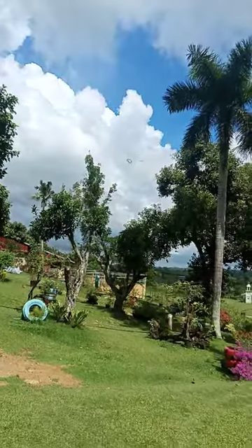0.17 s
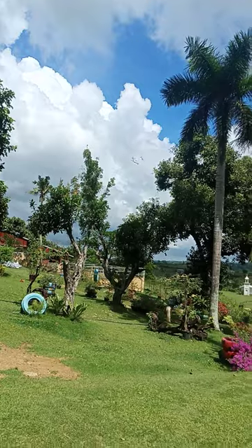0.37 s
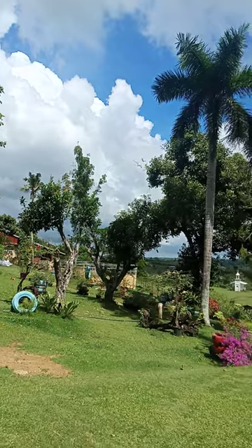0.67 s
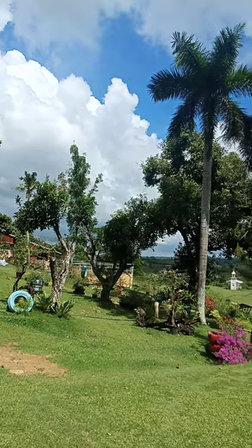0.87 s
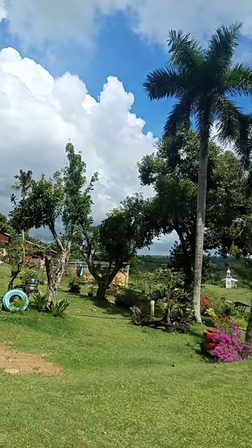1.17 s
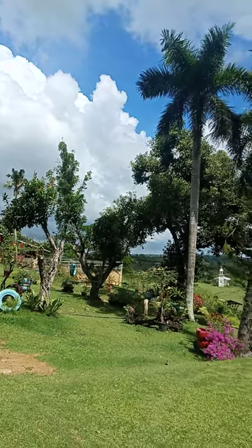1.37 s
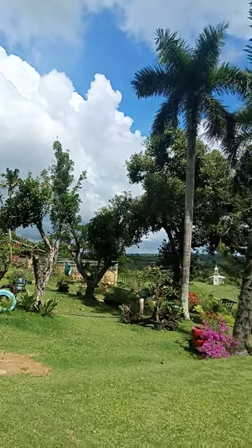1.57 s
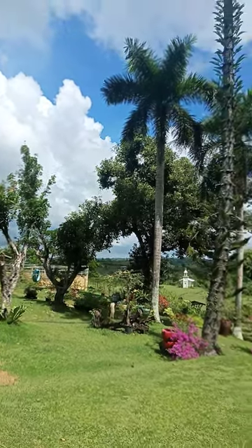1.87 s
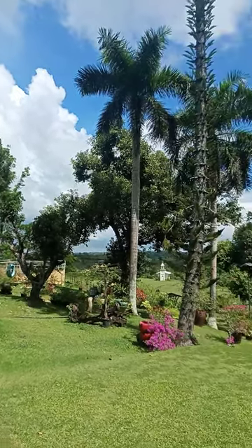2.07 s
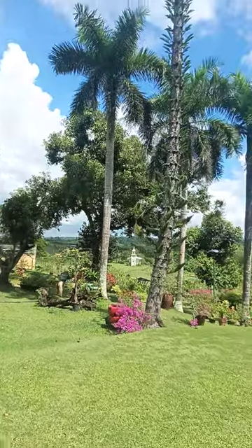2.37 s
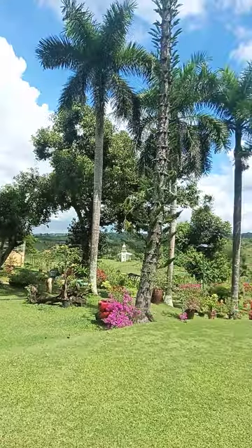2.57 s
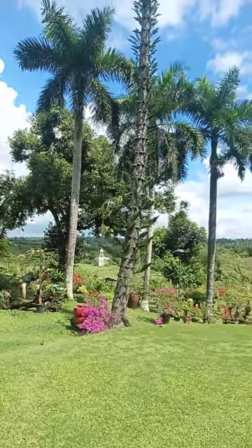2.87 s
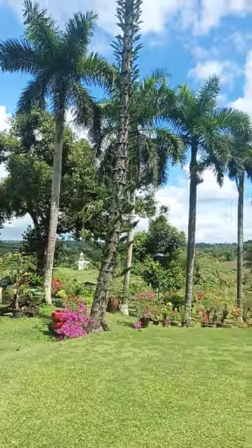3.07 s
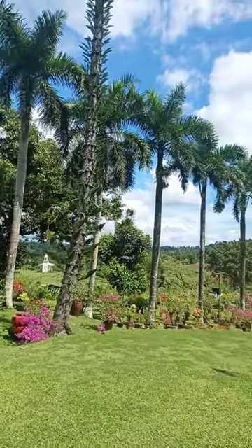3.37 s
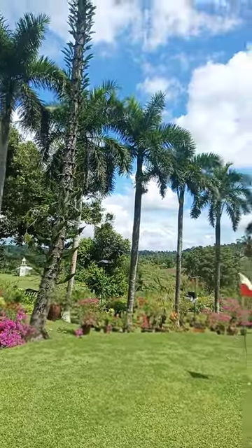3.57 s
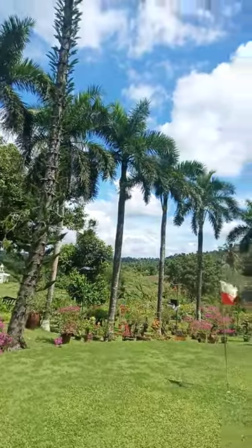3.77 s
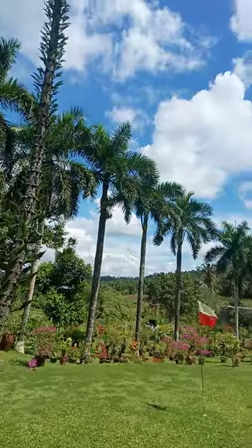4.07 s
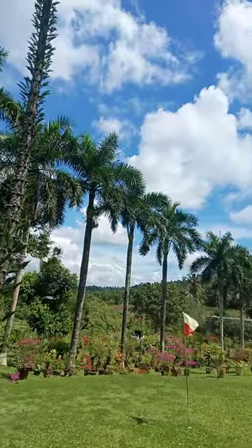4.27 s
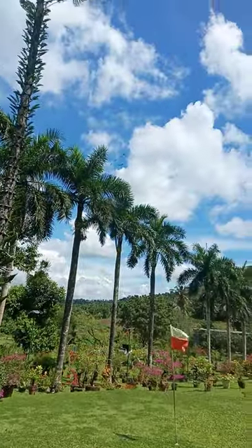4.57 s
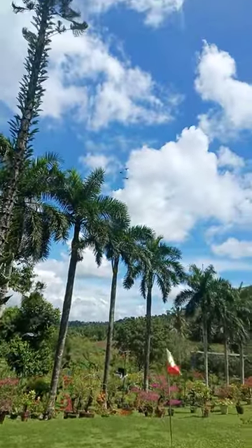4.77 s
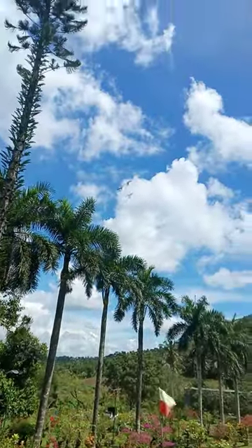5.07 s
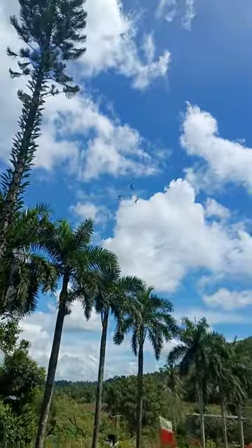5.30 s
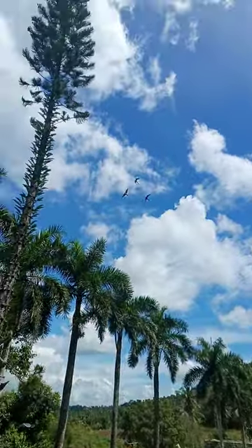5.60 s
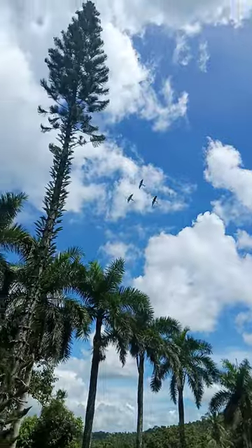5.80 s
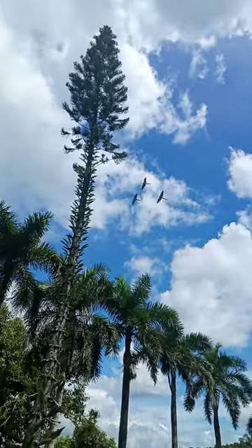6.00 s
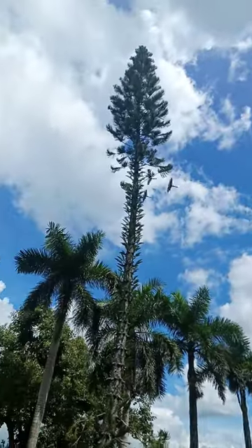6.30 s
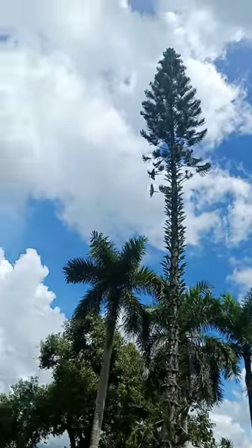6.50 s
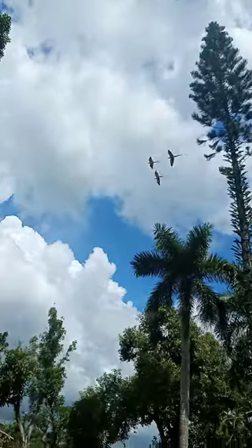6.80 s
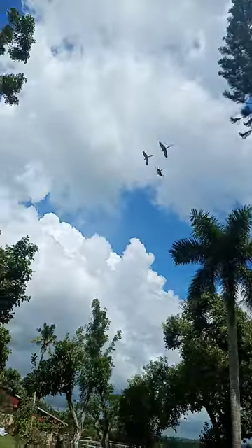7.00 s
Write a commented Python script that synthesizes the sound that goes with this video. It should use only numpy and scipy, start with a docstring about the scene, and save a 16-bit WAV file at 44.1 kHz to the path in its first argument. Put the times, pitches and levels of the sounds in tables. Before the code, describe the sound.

Loud raucous macaw calls ring out one after another outdoors, echoing softly off trees above quiet rustling, a low hum and wind puffs.

```python
"""Macaws over a garden

Macaws fly over, trading clear falling screams, harsh squawks and low rattling growls.
Screams and squawks are stacks of harmonics that roughen or break into pulses, shaped by throat and beak.
Growls are short throat rings restarted by each pulse. Trees scatter the calls into an echo.
Far birds whistle and rasp, over rumble, rustling, hum and gusts of wind made from filtered noise and a sine."""
import sys
import numpy as np
from scipy import signal
from scipy.fft import rfft, irfft, next_fast_len
from scipy.io import wavfile
from scipy.ndimage import uniform_filter1d, minimum_filter1d

SR = 44100
rng = np.random.default_rng(int(sys.argv[2]) if len(sys.argv) > 2 else 0)


def persist_wave(psi):
    """Save psi, clipped to +-1, as 16-bit WAV."""
    counts = np.round(np.clip(psi, -1, 1) * 32767).astype(np.int16)
    wavfile.write(sys.argv[1], SR, np.atleast_2d(counts).T)


N = 315178
TIME = np.arange(N) / SR  # s

# Background levels over time: t/s, distant rumble/dB, wind before gusts/dB, rustle before swells/dB
BREEZE_LEVELS = [(0, -40.5, -44.5, -45.5), (2.2, -39.5, -53, -42.5), (2.698, -47, -48, -41),
                 (3.2, -43.5, -42.5, -46.5), (4.9, -35.5, -34, -40), (7.15, -35.5, -39, -37.5)]
# Gusts on the microphone: peak t/s, length/s, level/dB
WIND_GUSTS = [(3.56, 0.18, -38), (4.415, .06, -27.5), (4.54, 0.072, -25), (5.49, 0.056, -25.5),
              (5.777, 0.12, -26), (6.173, 0.045, -17), (6.258, 0.07, -24.5), (6.863, 0.07, -22.5)]
# Swells of rustling: peak t/s, level/dB
RUSTLE_SWELLS = [(2.33, -37.5), (3.56, -36.5), (4.5, -33), (5.68, -36.5), (6.32, -31.5)]
# Level of the low hum over time: t/s, level/dB
HUM_LEVELS = [(0, -57.5), (3.3, -53.5), (4.3, -41.5), (5.6, -40), (6.1, -32.5), (7.15, -30)]
# Colour of the distant rumble: f/Hz, level/dB
RUMBLE_COLOUR = [(25, -20.5), (38, -17), (52, -11), (72, -1), (100, 6), (145, 2), (200, -5.5), (280, -13.5),
                 (400, -30), (800, -74.5)]
# Colour of the wind: f/Hz, level/dB
WIND_COLOUR = [(25, -23.5), (45, -7.5), (72, 3), (140, 1.5), (200, -6), (300, -19), (800, -70)]
# Colour of the rustling: f/Hz, level/dB
RUSTLE_COLOUR = [(150, -0.5), (280, -1), (550, -1), (900, -9), (1500, -13), (3000, -14.5), (5000, -46),
                 (9000, -68.5)]
# Colour of the countryside hiss: f/Hz, level/dB
COUNTRY_COLOUR = [(300, -18.5), (900, 4), (1600, 1), (2700, 0.5), (3200, -6), (4000, -8), (5000, -28),
                  (7000, -43.5), (10000, -59.5), (15000, -56.5)]
# Colour of the echo from the trees: f/Hz, level/dB
TREE_COLOUR = [(300, 1.5), (4000, 9.0), (7000, 12.5), (14000, -11.0)]

# Faint arched whistles: start t/s, end t/s, top pitch f/Hz, droop at the ends/0-1, level/dB
FAR_WHISTLES = [(0.01, 0.287, 1675, .025, -42.5), (0.168, 0.382, 1425, 0.16, -34),
                (0.281, .46, 1410, 0.06, -40), (0.329, .46, 1695, 0.05, -39),
                (1.08, 1.376, 1233, 0.14, -44.5), (1.75, 1.948, 1603, 0.12, -29.5),
                (6.48, 6.776, 1211, 0.05, -44.5)]
# Faint hoarse calls: start t/s, end t/s, level/dB, upper resonance/dB
HOARSE_CALLS = [(2.202, 2.856, -35, -12), (3.484, 3.704, -36.5, -7.5), (5.615, 5.914, -39.5, -3),
                (6.35, 6.427, -32, 5)]
# Growls: start t/s, end t/s, first pulse rate f/Hz, resonance before scoop and sag f/Hz,
# level/dB, swell/(dB per s)
GROWL_CALLS = [(.52, 1.08, 127.1, 1983, -27, 8), (2.419, 2.832, 119.4, 1834, -36.5, 20.5),
               (4.599, 5.096, 120.5, 2154, -28, 5)]
# Harsh squawks: start t/s, end t/s, attack/s, mid pitch f/Hz, rise/(Hz per s),
# mid level/dB, swell/(dB per s), upper resonance/dB
SQUAWK_CALLS = [(0.981, 1.385, .09, 1159, 100.5, -17.5, -4.5, -11.5),
                (3.665, 4.006, .004, 1207, 280, -16.5, 2, -14.5),
                (4.299, 4.639, .002, 1216, 22, -16, 2.5, -16),
                (5.627, 5.86, 0.0013, 1193, 6.5, -40, -3, -10.5),
                (5.88, 6.203, .002, 1144, 25.5, -18, 32.5, -15),
                (6.388, 6.705, 0.0083, 1188, -79.5, -16.5, -12, -13),
                (6.961, 7.251, .002, 1232, -450, -13.5, 33.5, -10)]
# Moments when a squawk holds a tone, then rattles slowly: t/s, length/s, pitch f/Hz, roughness/0-1,
# level change/dB, upper resonance change/dB, rattle rate f/Hz, rattle roughness/0-1
TONE_LOCKS = [(3.765, 0.047, 1249, 0.32, 1, -6, 73.3, 0.84),
              (4.392, 0.049, 1259, 0.28, 3.5, -4.5, 71.64, 0.83),
              (5.971, .046, 1094, .1, 1.5, -7.5, 60.6, 0.6), (6.505, .05, 1126, .6, -0.5, 0, 70.66, .84),
              (7.051, .052, 1157, .2, 5, -18, 63.2, 0.89)]
# Softer gliding cries: start t/s, end t/s, first pitch f/Hz, last pitch before the drop f/Hz,
# final drop/0-1, level/dB, upper resonance/dB, odd harmonics/dB, roughness/0-1
SOFT_CRIES = [(1.918, 2.07, 1046, 964, 0, -23, -12.5, -9, 0.09),
              (2.005, 2.238, 995, 906, .04, -27.5, -15, 6.5, .1),
              (2.814, 2.869, 1060, 1400, 0.01, -15, -14, 3, .22),
              (3.943, 4.231, 1052, 999, 0.1, -34, 2.5, -8.5, 0.23),
              (4.066, 4.148, 1025, 924, 0.08, -40, 11, -20.5, 0.3),
              (4.61, 4.723, 1036, 951, .11, -39.5, 7, -15.5, 0.44),
              (5.791, 5.887, 943, 1035, 0, -57, 9, -4.5, 0.2),
              (6.162, 6.45, 1038, 1005, 0.01, -30.5, 1.5, -12.5, 0.25)]
# Loud screams: (rows of t/s, second harmonic f/Hz, level before SCREAM_DB/dB, upper resonance/dB),
# roughness/0-1, break length/s, plunge/0-1, break roughness/0-1, odd harmonics/dB
LOUD_SCREAMS = [([(0.0, 2590, 2.5, -18), (0.008, 2494, -12, -10), (0.082, 2456, -13.5, -8.5),
                (0.098, 2603, -22.5, -6), (0.128, 2656, -12.5, -10.5), (0.146, 2710, -29, 2),
                (0.17, 2460, -18, -5), (0.188, 2659, -15.5, -11), (0.2, 2637, -11.5, -10)],
                0.099, 0.026, .32, 1, 0), ([(1.575, 2097, -24, -8), (1.599, 2335, -16, -20.5),
                (1.615, 2510, -21, -6), (1.699, 2543, -27, 2.5), (1.761, 2370, -12, -19),
                (1.819, 2266, -14.5, -20), (1.895, 2250, -9.5, -22), (1.925, 2170, -15.5, -28)],
                0.13, 0.038, 0.077, 0.13, 0), ([(2.86, 1953, -25.5, 0), (2.888, 2258, -9, -25),
                (2.904, 2300, -7, -16.5), (2.934, 2350, -14, -10.5), (2.972, 2282, -8.5, -24.5),
                (2.992, 2327, -12, -20.5), (3.138, 2228, -10.5, -28), (3.17, 2124, -17, -14),
                (3.25, 2159, -20.5, -11.5)], 0.039, 0.06, 0.27, 0.41, -1)]
# Throat and beak in a far call: f/Hz, level/dB
FAR_CALL_THROAT = [(900, -13.5), (1500, -7.5), (1900, -3), (2400, -1), (3100, -4.5), (4000, -5.5),
                   (4600, -22), (5300, -38), (7000, -43), (12000, -67.5)]
# Colour of a growl's rasp: f/Hz, level/dB
RASP_COLOUR = [(1000, -14.5), (1500, -9), (2000, -4.5), (2700, 2), (3500, -11), (4200, -12), (4900, -42.5),
               (7000, -46.5), (12000, -62.5)]
# Throat and beak in a squawk: f/Hz, level/dB
SQUAWKING_THROAT = [(700, -29), (1200, -35.5), (1550, -24), (2000, -8.5), (2400, -5.5), (3150, -11),
                    (3650, -6.5), (4050, -3), (4500, -18), (5500, -33.5), (6500, -37.5), (7600, -47),
                    (9000, -50), (10500, -55.5), (15000, -63)]
# Throat and beak in a scream or softer cry: f/Hz, level/dB
SCREAMING_THROAT = [(700, -44.5), (1150, -27.5), (1600, -9), (2000, 5.5), (2500, 2.5), (3050, -13),
                    (3600, -13.5), (4100, -14.5), (4650, -27.5), (5600, -41.5), (6300, -48.5),
                    (8500, -51.5), (11000, -61.5), (15000, -69)]

COUNTRY_DB, HUM_HZ = -40.5, 69.8
GUST_RISE = 0.6  # rise time as a share of the gust's length
RUSTLE_RISE_S, RUSTLE_FALL_S = 0.14, 0.22
FADE_DB = -9.5  # where an attack starts from and a release ends
WHISTLE_FADE_S = 0.055
GROWL_ATTACK_S, GROWL_RELEASE_S = 0.051, 0.07
GROWL_SCOOP, GROWL_SCOOP_S = 0.14, 0.063  # the resonance starts lower by this share
GROWL_SLOWING_PER_S, GROWL_SAG_PER_S = 0.13, 0.15  # pulses slow, resonance sinks as the air runs down
RASP_RATE_HZ, RASP_ROUGH = 125, 1  # pulse rate after spin-up, and roughness, both before any lock
SPIN_UP, SPIN_UP_S = 0.22, 0.05  # the pulses start slower by this share
SQUAWK_RELEASE_S, LOCK_SLEW_S = 0.05, 0.016
CRY_ATTACK_S, CRY_RELEASE_S = 0.029, 0.03
CRY_DROP_S = 0.03  # the pitch drops as the air runs out
SCREAM_DB, SCREAM_ATTACK_S = -0.5, 0.013
BREAK_DB = -9  # the voice fades by this much as it breaks
CEILING_DB, LIMITER_S, TOP_HZ = -3, 0.0086, 15500


def undb(db):
    """Turn decibels into gain."""
    return 10 ** (np.asarray(db) / 20)


def unit(x):
    """Scale to an average (rms) level of 1."""
    return x / np.sqrt(np.mean(x ** 2))


def steady(x, span_s=0.074):
    """Hold the running rms level at 1, keeping the fast pulsing."""
    power = uniform_filter1d(x ** 2, int(span_s * SR))
    return x / np.sqrt(power + 1e-12)


def span(start, end):
    """Give the sample times of a call."""
    return np.arange(int(start * SR), int(end * SR)) / SR


def contour(t, attack_s, release_s):
    """Shape attack, hold and release, in dB."""
    attack = np.maximum(1 - (t - t[0]) / attack_s, 0)
    release = np.maximum(1 - (t[-1] - t) / release_s, 0)
    return FADE_DB * (attack + release)


def surge(at, rise_s, fall_s):
    """Make a rounded swell that peaks at 1."""
    width_s = np.where(TIME < at, rise_s, fall_s)
    return np.exp(-((TIME - at) / width_s) ** 2)


def add(out, t, x, fade_s=0.0024):
    """Mix a call in at its time, with softened ends."""
    nearest_end_s = np.minimum(t - t[0], t[-1] - t)
    x = x * np.clip(nearest_end_s / fade_s, 0, 1)
    start = int(t[0] * SR)
    out[start:start + len(x)] += x[:max(N - start, 0)]


def noise(t):
    """Draw white noise for the given times."""
    return rng.standard_normal(N)[np.rint(t * SR).astype(int) % N]


def walk(t, rate):
    """Wander between random levels, rate a second, joined by lines; spread near 1."""
    values = rng.standard_normal(N // 4)
    return np.interp(t * rate, np.arange(len(values)), values) * np.sqrt(3 / 2)


def colour(x, points):
    """Filter by a spectrum of (f/Hz, level/dB) points, falling away below the first."""
    hz, db = np.transpose(points)
    size = next_fast_len(len(x) + SR // 20)
    f = np.maximum(np.arange(size // 2 + 1) * SR / size, 1)
    gain = undb(np.interp(np.log(f), np.log(hz), db))
    gain = gain * np.minimum(f / hz[0], 1) ** 2
    return irfft(rfft(x, size) * gain, size)[:len(x)]


def open_air(buffet_db=1, flicker_db=1):
    """Mix distant rumble, gusting wind, soft rustling, countryside hiss and a wavering hum."""
    s, *columns = np.transpose(BREEZE_LEVELS)
    rumble_db, wind_db, rustle_db = (np.interp(TIME, s, c) for c in columns)
    gusts = sum(undb(db) * surge(at, GUST_RISE * length, length) for at, length, db in WIND_GUSTS)
    swells = sum(undb(db) * surge(at, RUSTLE_RISE_S, RUSTLE_FALL_S) for at, db in RUSTLE_SWELLS)

    rumble = unit(colour(noise(TIME), RUMBLE_COLOUR)) * undb(rumble_db)
    # hypot adds the power of the swells to that of the steady part
    wind = unit(colour(noise(TIME), WIND_COLOUR)) * np.hypot(undb(wind_db), gusts)
    wind = wind * undb(buffet_db * walk(TIME, 23))
    rustle = unit(colour(noise(TIME), RUSTLE_COLOUR)) * np.hypot(undb(rustle_db), swells)
    rustle = rustle * undb(flicker_db * walk(TIME, 40))
    country = unit(colour(noise(TIME), COUNTRY_COLOUR))
    country = country * undb(COUNTRY_DB + flicker_db * walk(TIME, 5))
    hum_hz = HUM_HZ * (1 + 0.008 * walk(TIME, 5.4))
    hum = unit(np.sin(2 * np.pi * np.cumsum(hum_hz) / SR))
    hum = hum * undb(np.interp(TIME, *np.transpose(HUM_LEVELS)))
    return rumble + wind + rustle + country + hum


def trees(x, near_db=-14, near_t60=0.28, far_db=-19, far_t60=0.86):
    """Scatter calls off the lawn and nearby palms, with a longer tail from the tree line."""
    t = TIME[:SR]
    # each t60 is the time in s for the echo to fall by 60 dB
    near = unit(noise(t) * (t > 0.003) * undb(-60 * t / near_t60)) * undb(near_db)
    far = unit(noise(t) * (t > 0.04) * undb(-60 * t / far_t60)) * undb(far_db)
    response = colour((near + far) / np.sqrt(len(t)), TREE_COLOUR)
    return signal.fftconvolve(x, response)[:N]


def whistle(row, tremble=0.0018, waver_db=1.5):
    """Sing a nearly pure note: one sine whose pitch arches up and down."""
    start, end, top_hz, droop, db = row
    t = span(start, end)
    hz = top_hz * (1 - droop * np.linspace(-1, 1, len(t)) ** 2)
    db = db + contour(t, WHISTLE_FADE_S, WHISTLE_FADE_S)
    phase = 2 * np.pi * np.cumsum(hz * (1 + tremble * walk(t, 200))) / SR
    return t, unit(np.sin(phase)) * undb(db + waver_db * walk(t, 40))


def beak(x, upper_db):
    """Set the upper resonances against the main one, as the opening of the beak does."""
    low_pass = signal.butter(8, 3100, fs=SR, output="sos")
    low = signal.sosfiltfilt(low_pass, x)
    return steady(low) + undb(upper_db) * steady(x - low)


def far_call(start, end, db, upper_db, flutter_db=2):
    """Make a squawk from far off, smeared to a hoarse rush of noise."""
    t = span(start, end)
    rush = noise(t) * undb(flutter_db * walk(t, 150))
    return t, beak(colour(rush, FAR_CALL_THROAT), upper_db) * undb(db)


def pulse_phase(t, rate_hz, scatter):
    """Give the position 0-1 within each of a run of uneven pulses."""
    return np.cumsum(rate_hz * np.exp(scatter * walk(t, 150))) / SR % 1


def growl(row, jitter=0.012, rasp_db=-6, pulse_db=10):
    """Pulse slowly and evenly, each pulse restarting a short throat ring with a puff of rasp."""
    start, end, rate_hz, hz, db, swell_db_per_s = row
    t = span(start, end)
    age_s = t - start
    scoop = GROWL_SCOOP * np.exp((start - t) / GROWL_SCOOP_S)
    hz = hz * (1 - scoop - GROWL_SAG_PER_S * age_s)
    db = db + swell_db_per_s * (t - t.mean()) + contour(t, GROWL_ATTACK_S, GROWL_RELEASE_S)
    rate_hz = rate_hz * (1 - GROWL_SLOWING_PER_S * age_s)
    phase = pulse_phase(t, rate_hz, 0.012)
    ring_hz = hz * (1 + jitter * walk(t, 300))
    # phase / rate_hz is the time since the pulse began
    ring = np.sin(2 * np.pi * ring_hz * phase / rate_hz) * np.sin(np.pi * phase)
    swell = undb(pulse_db * np.sin(np.pi * phase) ** 2)
    rasp = unit(colour(noise(t) * swell, RASP_COLOUR))
    voice = unit(ring * swell) + undb(rasp_db) * rasp
    return t, unit(voice) * undb(db)


def syrinx(hz, odd_db=0, fading_db=3, count=12):
    """Stack harmonics on a moving pitch; the odd ones weaken as alternate cycles grow alike."""
    phase = 2 * np.pi * np.cumsum(hz) / SR
    t = np.arange(len(hz)) / SR
    tone = np.zeros(len(hz))
    for k in range(1, count + 1):
        # in flight the ground reflection keeps shifting, so each harmonic swells and fades on its own
        gain = undb(odd_db * (k % 2) + fading_db * walk(t, 23.36))
        tone += np.cos(k * phase) * gain * (k * hz < SR / 2)
    return tone


def squawk_course(row):
    """Plan a fast rasp; after any held tone it rattles at about half the pulse rate."""
    start, end, attack_s, hz, rise, db, swell, upper_db = row
    t = span(start, end)
    from_middle = t - (start + end) / 2
    hz = hz + rise * from_middle
    db = db + swell * from_middle + contour(t, attack_s, SQUAWK_RELEASE_S)
    rough = RASP_ROUGH
    rate_hz = RASP_RATE_HZ * (1 - SPIN_UP * np.exp((start - t) / SPIN_UP_S))
    for at, length, lock_hz, lock_rough, lock_db, lock_upper_db, rattle_hz, rattle_rough in TONE_LOCKS:
        if start < at < end:
            # entered and left each slide from 0 to 1
            entered = np.clip((t - at) / LOCK_SLEW_S + 0.5, 0, 1)
            left = np.clip((t - (at + length)) / LOCK_SLEW_S + 0.5, 0, 1)
            locked = entered - left
            hz = hz + (lock_hz - hz) * locked
            db = db + lock_db * locked
            upper_db = upper_db + lock_upper_db * locked
            rough = rough * (1 - entered) + lock_rough * locked + rattle_rough * left
            rate_hz = rate_hz * (1 - left) + rattle_hz * left
    return t, hz, db, upper_db, rough, rate_hz


def squawk(course, fall=0.5, jitter=0.0441, lurch=0.06, pulse_db=11, scatter=0.3, odd_db=-3,
           opening=0.746, opening_s=0.006):
    """Overdrive the syrinx: it slaps in pulses that fall in pitch, and may lock on a tone."""
    t, hz, db, upper_db, rough, rate_hz = course
    rough = np.clip(rough, 0, 1)
    # the first slap is a clean dive from far above, before the membranes turn chaotic
    age = (t - t[0]) / opening_s
    rough = rough * (1 - np.exp(-(age / 2) ** 4))
    dive = opening * (1 - age) * np.exp(-age)
    phase = pulse_phase(t, rate_hz, scatter * rough ** 2)
    # each pulse bursts open high and sinks quickly; the starting pitch varies
    sweep = fall * ((1 - phase) ** 2 - 1 / 4) + lurch * walk(t, 230)
    bend = dive + rough ** 3 * sweep + rough * jitter * walk(t, 1500)
    rasp = 2.1 * rough ** 2 * noise(t)
    swell = undb(pulse_db * np.minimum(2 * rough, 1) * (np.sin(np.pi * phase) - 1))
    tone = syrinx(hz * np.exp(bend), odd_db)
    voice = colour((tone + rasp) * swell, SQUAWKING_THROAT)
    return t, beak(voice, upper_db) * undb(db)


def soft_course(row):
    """Plan a softer cry that glides evenly and drops in pitch by its own share as it ends."""
    start, end, first_hz, last_hz, drop, db, upper_db, odd_db, rough = row
    t = span(start, end)
    glide_hz = np.linspace(first_hz, last_hz, len(t))
    hz = glide_hz * (1 - drop * np.exp((t - end) / CRY_DROP_S))
    return t, hz, db + contour(t, CRY_ATTACK_S, CRY_RELEASE_S), upper_db, rough, odd_db


def loud_course(call):
    """Plan a loud scream that runs its course, then plunges, changes roughness and fades."""
    table, rough, break_s, plunge, break_rough, odd_db = call
    s, *columns = np.transpose(table)
    t = span(max(s[0], 0), s[-1] + break_s)
    second_hz, db, upper_db = (np.interp(t, s, c) for c in columns)
    broken = np.maximum(t - s[-1], 0) / break_s  # 0 until the break, 1 at its end
    hz = second_hz / 2 * (1 - plunge * broken ** 1.4)
    db = db + SCREAM_DB + BREAK_DB * broken + contour(t, SCREAM_ATTACK_S, SCREAM_ATTACK_S)
    rough = rough + (break_rough - rough) * broken ** 2
    return t, hz, db, upper_db, rough, odd_db


def scream(course, jitter=0.045, hiss=2.3):
    """Cry in clear harmonics; roughness makes the pitch tremble and adds hiss."""
    t, hz, db, upper_db, rough, odd_db = course
    tremble = rough * jitter * (walk(t, 1100) + walk(t, 220))
    tone = syrinx(hz * np.exp(tremble), odd_db)
    voice = colour(tone + hiss * rough * noise(t), SCREAMING_THROAT)
    return t, beak(voice, upper_db) * undb(db)


def scene():
    """Mix all the birds, their echo and the open air."""
    birds = np.zeros(N)
    for row in FAR_WHISTLES:
        add(birds, *whistle(row))
    for row in HOARSE_CALLS:
        add(birds, *far_call(*row), fade_s=0.014)
    for row in GROWL_CALLS:
        add(birds, *growl(row))
    for row in SQUAWK_CALLS:
        add(birds, *squawk(squawk_course(row)))
    for row in SOFT_CRIES:
        add(birds, *scream(soft_course(row)))
    for call in LOUD_SCREAMS:
        add(birds, *scream(loud_course(call)))
    return (birds + trees(birds) + open_air())[None]


def record(dry):
    """Hold down the loudest peaks with a limiter, then cut the top of the treble."""
    window = max(int(LIMITER_S * SR), 3)
    gain = np.minimum(undb(CEILING_DB) / (np.abs(dry) + 1e-9), 1)
    # spread each dip to both sides, then smooth it twice
    gain = minimum_filter1d(gain, 2 * window)
    gain = uniform_filter1d(uniform_filter1d(gain, window), window)
    top_cut = signal.ellip(8, 0.2, 70, TOP_HZ, fs=SR, output="sos")
    return signal.sosfilt(top_cut, dry * gain)


dry = scene()
out = record(dry)
persist_wave(out)
```